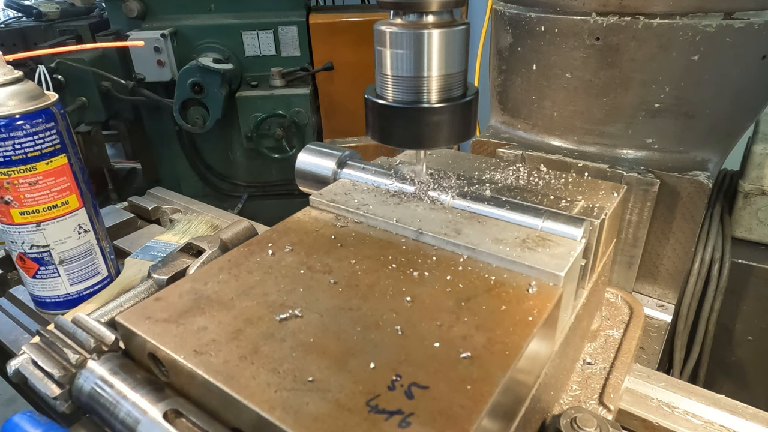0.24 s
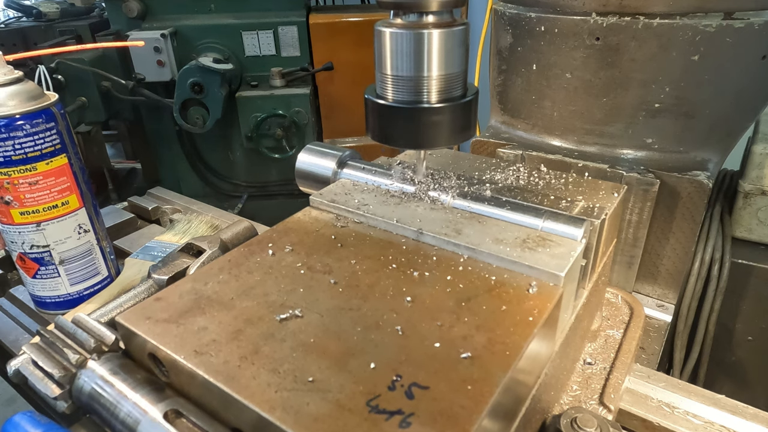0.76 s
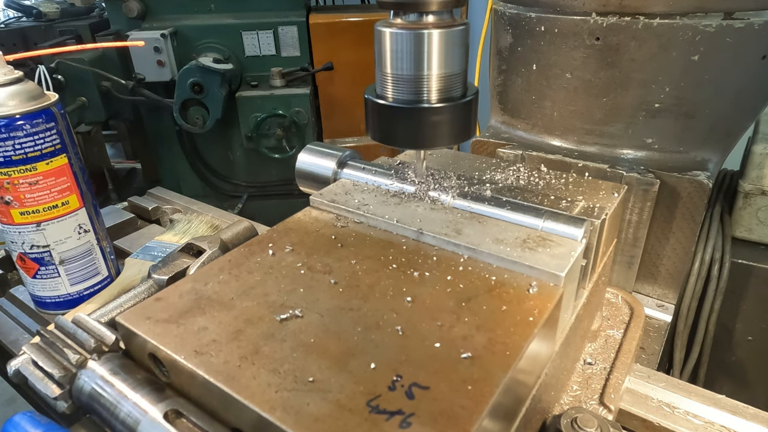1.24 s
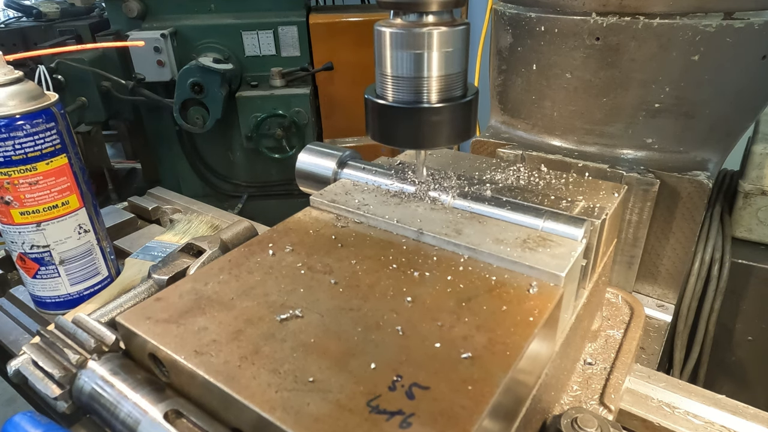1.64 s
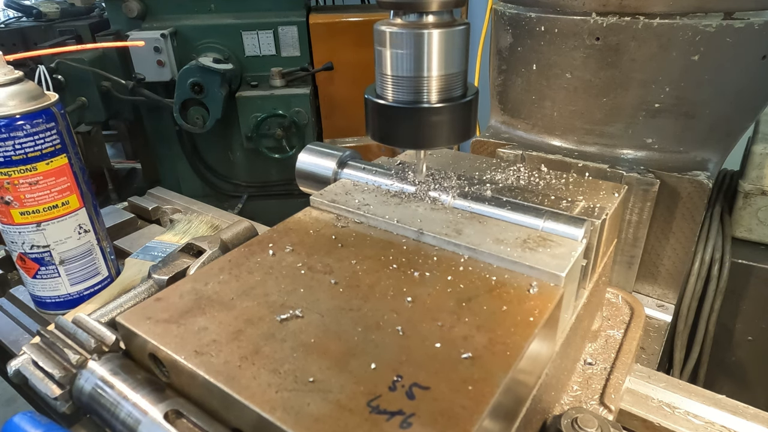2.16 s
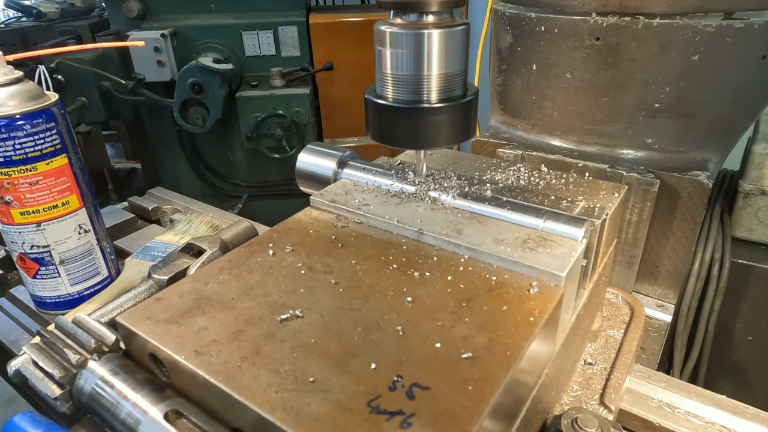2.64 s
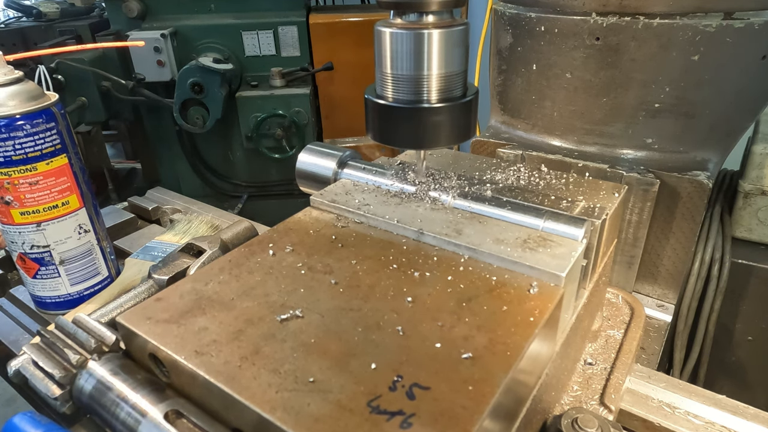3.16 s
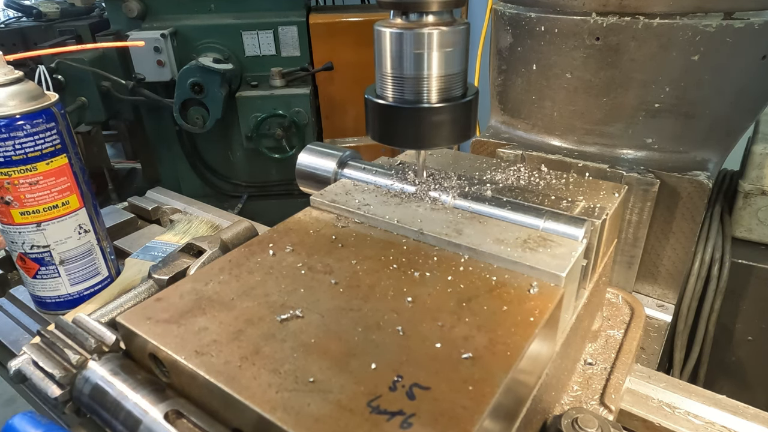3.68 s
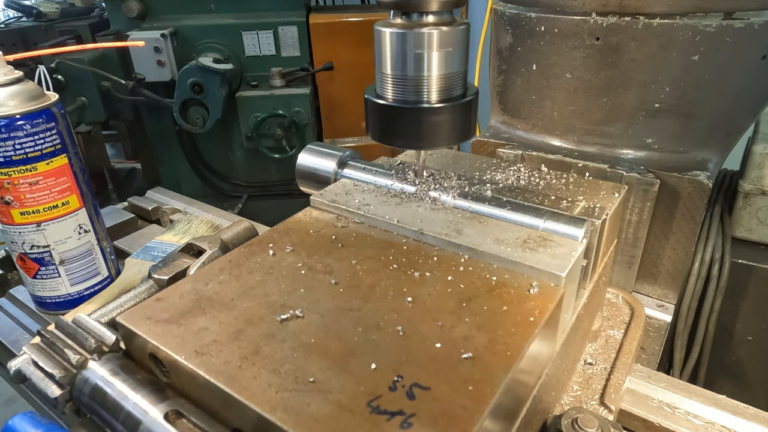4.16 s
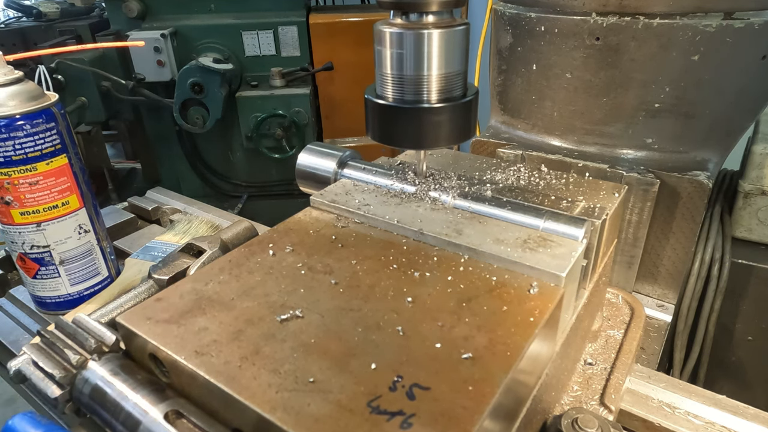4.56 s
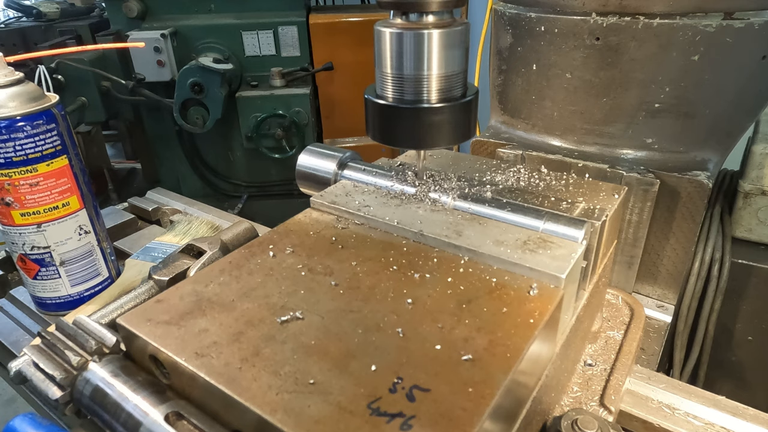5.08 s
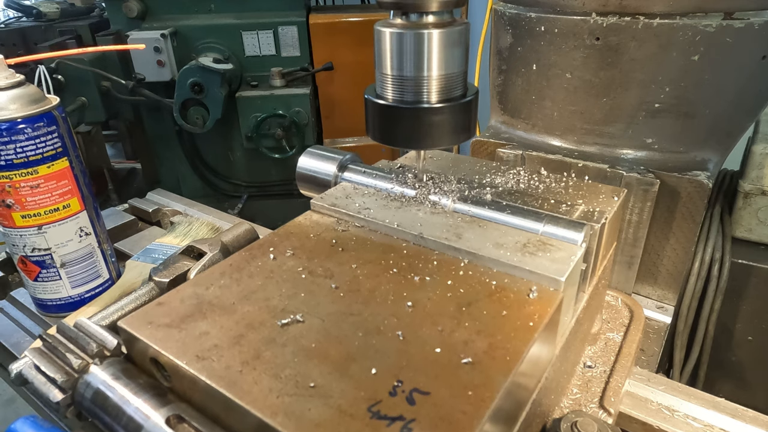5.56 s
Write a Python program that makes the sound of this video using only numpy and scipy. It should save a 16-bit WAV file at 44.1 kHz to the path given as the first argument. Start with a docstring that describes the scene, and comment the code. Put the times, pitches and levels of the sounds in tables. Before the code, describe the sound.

Continuous close mono sound of steel being milled, already under way. Fluttering gear whine and low motor rumble form the bed; over it comes a rapid chattering rasp, bright chip hiss and a wavering high whistle. Brief gliding squeaks scatter throughout, crowding in the middle and late parts. Near the end the cut lightens, the vice rings less, and the whistle drops in pitch. Short room echoes only.

```python
"""A vertical milling machine cuts a keyway in a steel shaft, close by in a workshop.
Throughout, a gear sings, throbbing once a turn, over gearbox rumble and the humming vice and table.
From the start two flutes rasp, hiss and snap off chips; the cutter whistles, higher while a flute presses.
Squeaks of flutes on the slot wall run through the cut.
Towards the end the cut lightens and the whistle sinks to the cutter's free pitch."""
import sys
import numpy as np
from scipy import signal
from scipy.fft import rfft, irfft
from scipy.io import wavfile
from scipy.ndimage import uniform_filter1d

SR = 44100
rng = np.random.default_rng(int(sys.argv[2]) if len(sys.argv) > 2 else 0)


def persist_wave(psi):
    """Save psi, clipped to +-1, as 16-bit WAV."""
    counts = np.round(np.clip(psi, -1, 1) * 32767).astype(np.int16)
    wavfile.write(sys.argv[1], SR, np.atleast_2d(counts).T)


N = 256662
TIME = np.arange(N) / SR  # s
BINS = np.fft.rfftfreq(N, 1 / SR)  # Hz

# gear mesh: time_s, tooth_rate_hz
MESH_RATE = [(0, 557.0), (.4, 555.9), (1.5, 556.1), (3.3, 556.4), (4.0, 556.8), (5.82, 556.9)]
# even part of the mesh tone: time_s, level_db
STEADY_MESH = [(0, -44), (1.3, -45), (1.9, -29), (3.3, -39), (3.8, -16.5), (4.5, -24.5), (5, -17),
               (5.5, -25), (5.82, -25.5)]
# runout of the gear and of shafts geared to it: turns_per_gear_turn, level_db, high_spot_gear_turns
SHAFT_RUNOUT = [(1.502, -29.5, .1), (3, -31.5, .22), (-3, -37, .23), (.5, -37, .88), (-.5, -37.5, 1.35),
                (2.5, -37.5, -.02), (2, -29, -.064), (-1, -39, -.2)]
# side tones of worn teeth: turns_per_gear_turn, level_db
TOOTH_WEAR = [(-1.5, -38.5), (3.5, -53.5), (4, -44), (4.5, -41), (6, -38.5)]
GEAR_TEETH = 33
SLACK_AT, PEAK_AFTER, SLACK_FORCE = 0.624, 0.72, .015  # turn shares; force as a factor
THROB_DB, LEAD_RAD = -12, 3.25
SPINDLE_BEAT_DB, SPINDLE_BEAT_S = -28.5, 0.041

# course of the cut: time_s, table_force_db, relative_chip_hiss_db, pitch_rise_at_full_contact_hz
CUT_COURSE = [(0, 6, -58.5, 2400), (1.2, 3.5, -59, 2443), (2.2, 2.5, -60.5, 2505), (3.4, 1.5, -62, 2500),
              (4.1, -1.5, -64, 2294), (4.3, 1, -70, 1566), (4.6, -2.5, -72.5, 1404), (4.9, -2, -70.5, 1477),
              (5.3, -9.5, -72, 1415), (5.5, 1, -71, 550), (5.82, -2, -72, 149)]
# deep and shallow flute: entry_turns, stay_turns, depth_0_to_1, relative_whistle_db
FLUTES = [(0.077, .49, 0.97, 0.5), (.55, .46, .72, -2)]
SPINDLE_HZ, FIRST_BITE_S = 15.636, .012
ARCH_POWER = 0.86  # under 1: pitch leaps on entry, drops late
ATTACK_SHARE, FADE_DB = .04, -13  # share of a flute's stay; fade at its end

# readiness of the cutter to whistle: time_s, level_db
WHISTLE_LEVEL = [(0, -42), (2.2, -39.5), (2.6, -39), (3.0, -39), (3.6, -37.5), (4.1, -37), (4.65, -42),
                 (4.9, -37), (5.3, -38.5), (5.5, -42.5), (5.82, -33.5)]
FREE_HZ = 4263  # cutter's bending pitch when no flute touches
TOP_HZ = 7170  # highest pitch that whistle and squeaks reach
SING_PULSES, SING_PEAK_S = 4, 5.653  # pulses per turn; time of one pulse

# squeaks at set times, loud and faint: middle_s, length_s, level_db, pitch_hz, glide_over_length_hz
SET_SQUEAKS = [(0.409, 0.021, -27.0, 5620, -1750), (0.437, 0.006, -24, 6220, -750),
               (0.47, 0.011, -23, 6330, 500), (0.596, 0.006, -25.0, 6760, 3000),
               (0.854, 0.0086, -19.5, 5380, 1750), (0.982, 0.006, -23, 6960, 2250),
               (1.046, 0.009, -24, 5600, -250), (1.177, 0.009, -22.5, 6380, -750),
               (1.335, 0.025, -33, 5620, 0), (1.371, 0.015, -18.5, 6420, -3500),
               (1.435, 0.025, -27.0, 6570, 0), (1.883, 0.013, -23, 6480, 750),
               (1.945, 0.0073, -24.5, 6370, -3500), (2.335, 0.023, -37, 5510, -250),
               (2.355, 0.006, -19, 5100, 3500), (2.392, 0.016, -20, 6870, 248.5),
               (2.457, 0.025, -22.5, 6430, 2000), (2.491, 0.013, -23, 6680, 500),
               (2.525, 0.027, -22.5, 6120, 1250), (2.583, 0.026, -20.5, 6050, 3500),
               (2.645, 0.021, -21.5, 5230, 1250), (2.65, 0.009, -15.5, 5530, 2500),
               (2.669, 0.006, -18, 5280, 1250), (2.712, 0.011, -21, 6460, -1250),
               (2.722, 0.0067, -23.0, 6800, 1000), (2.737, 0.0076, -25.0, 4970, 2250),
               (2.775, 0.0066, -20, 5990, -1000), (2.783, 0.025, -27.0, 5730, -1000),
               (2.794, 0.0053, -22.0, 5000, 750), (2.835, 0.009, -26, 5250, 2498),
               (2.861, 0.009, -25, 4700, -1000), (3.024, 0.0055, -26, 5540, -500),
               (3.104, 0.0044, -24.5, 6220, 3500), (3.161, 0.018, -27.5, 6450, -3500),
               (3.226, 0.017, -25, 6400, -3500), (3.287, 0.0081, -18.5, 5920, -1750),
               (3.42, 0.027, -21, 5960, -2000), (3.471, 0.006, -24, 5320, 3500),
               (3.48, 0.013, -24.5, 6430, -750), (3.546, 0.015, -17.5, 6520, -1000),
               (3.564, 0.0065, -24, 4540, 2500), (3.6, 0.0082, -21, 5000, 3250),
               (3.61, 0.009, -22, 6520, -250), (3.618, 0.026, -25, 6160, -1000),
               (3.672, 0.012, -30, 6760, 0), (3.692, 0.0067, -18.5, 4270, -3500),
               (3.744, 0.011, -24.5, 6050, 2996), (3.793, 0.011, -17.0, 5290, 3252),
               (3.838, 0.025, -38, 5710, 1250), (3.855, 0.0066, -22, 4720, 3500),
               (3.868, 0.022, -21, 6400, -250), (3.885, 0.009, -24.0, 4860, -2500),
               (3.997, 0.011, -29, 6570, 2500), (4.111, 0.006, -23.0, 4970, 3498),
               (4.175, 0.007, -26.5, 4700, 2500), (4.321, 0.016, -28, 5130, 2747.5),
               (4.383, 0.014, -25.5, 5380, -1500), (4.445, 0.0065, -23.0, 5750, 1739),
               (4.761, 0.03, -33, 5560, -250), (4.879, 0.007, -31, 4800, 3003),
               (4.885, 0.022, -27.5, 5600, -1000), (4.957, 0.03, -28, 5620, -250),
               (4.97, 0.011, -20.5, 4480, -750), (5.006, 0.007, -24.5, 4600, 3002),
               (5.012, 0.011, -24, 5600, 2), (5.034, 0.0098, -27.0, 4550, -1750),
               (5.044, 0.013, -29, 5100, -500), (5.073, 0.009, -21.0, 5400, -500),
               (5.098, 0.009, -18.5, 4500, -1000), (5.114, 0.0068, -30, 5040, 1753),
               (5.143, 0.014, -24, 5630, -500), (5.172, 0.02, -31.5, 4950, 1500),
               (5.206, 0.018, -24, 5530, -250), (5.237, 0.022, -30.0, 4890, 1250),
               (5.267, 0.025, -32, 5300, 1255.5), (5.33, 0.023, -33.5, 5700, -500),
               (5.396, 0.018, -21.5, 5120, 246), (5.417, 0.025, -27, 4430, -250),
               (5.458, 0.025, -30.0, 4720, 0), (5.488, 0.013, -29, 4650, 504),
               (5.521, 0.018, -20, 4740, 757), (5.545, 0.0087, -16.5, 4290, 5),
               (5.584, 0.023, -18.5, 4740, 0), (5.605, 0.02, -25, 4470, -1000),
               (5.651, 0.009, -16.5, 4470, 0), (5.668, 0.017, -25.0, 4230, -500),
               (5.683, 0.015, -31.5, 4330, -500), (5.718, 0.025, -24, 4390, 0),
               (5.747, 0.027, -26, 4270, 250), (5.777, 0.02, -16.5, 4390, 250),
               (5.795, 0.031, -36, 4370, -250), (5.808, 0.018, -31, 4360, 0)]
# scrape around a squeak: frequency_hz, spectrum_db_per_hz
SQUEAK_FIZZ = [(2000, -14), (7000, 2.5), (8000, 1), (10000, 2), (12500, 4.5), (14400, -10.5)]
LIGHT_SQUEAK_S, SQUEAK_ROUGH = 0.014, .42
SHAFT_HZ, SHAFT_Q = 5620, 35  # shaft mode ringing on after a squeak

# rasp of sheared steel: frequency_hz, spectrum_db_per_hz
RASP_SPECTRUM = [(100, -37.5), (500, 3.5), (950, -0.5), (1300, 1), (1800, -2), (2500, -3.5), (3300, -8),
                 (4000, -11), (5300, -15.5), (5900, -26), (7000, -34), (7800, -50), (14000, -46)]
# hiss of chips: frequency_hz, spectrum_db_per_hz
HISS_SPECTRUM = [(3000, 5), (5500, 17.5), (6700, 16), (7350, 15.5), (7600, 7), (8200, 5), (8600, 4),
                 (9500, 0.5), (10500, 6), (11500, 1.5), (13000, -8), (13700, -26), (14400, -22)]
# resonances of shaft and spindle head: frequency_hz, width_hz, level_db
HEAD_MODES = [(1130, 34, -44.5), (1178, 96, -49.5), (1348, 25, -45), (1370, 40, -50.5), (1438, 13, -45.5),
              (1630, 94, -45.5), (1774, 69, -50), (2010, 14, -49.5)]
# shaft modes ticked by chips crushed on the slot wall: frequency_hz, width_hz, relative_level_db
WALL_MODES = [(3107, 120, -47), (3600, 170, -46), (5540, 240, -45)]
# crunches at set times, mostly strong, one very faint: middle_s, relative_level_db
SET_CRUNCHES = [(.16, -22.5), (0.403, -20.5), (.422, -28), (.456, -27), (.545, -30), (.66, -26.5),
                (1.305, -30), (1.358, -21), (1.492, -20.5), (2.07, -24), (3.385, -25), (3.47, -20.5),
                (4.085, -23), (4.369, -26.5), (4.756, -23), (4.79, -23), (4.85, -44), (4.921, -25)]
RASP_DB, RASP_DB_PER_FORCE_DB = -32, .27

# large chips snapping off: time_s, relative_level_db
CHIP_SNAPS = [(0.268, -39), (.459, -37), (1.292, -40), (1.356, -43), (1.835, -36.5), (2.0178, -41),
              (2.6504, -42), (3.7908, -44), (4.9626, -43)]
# chip snap: frequency_hz, spectrum_db_per_hz
SNAP_SPECTRUM = [(800, -5), (3000, 22.5), (6500, 20.5), (7400, 4), (7900, 2.5), (11000, 5.5), (12500, -2),
                 (13500, -13), (14400, -6)]
# edge skidding before it bites: frequency_hz, spectrum_db_per_hz
SCRAPE_SPECTRUM = [(1000, -17.5), (2000, -7), (3300, 1), (4300, -0.5), (5400, -3.5), (6500, -16),
                   (7500, -36.5), (14000, -39)]

# resonances of vice and table driven by the cut: frequency_hz, width_hz, relative_level_db
TABLE_MODES = [(673, 41, -40.5), (757, 26, -37.5), (823, 120, -37)]
# sharp vice modes, strong under a heavy cut: frequency_hz, width_hz, relative_level_db
VICE_MODES = [(715, 18, -39.5), (750, 18, -41), (816.7, 6.2, -40.5)]
# hum from the flute beat: multiple_of_spindle_rate, relative_level_db
FLUTE_ORDERS = [(46, -46), (48, -46.5), (50, -47), (52, -41), (56, -52)]
# ringing of vice and table: time_s, relative_level_db
CLAMP_RINGING = [(0, -25), (.5, -26.5), (.65, -25.5), (1.35, -25), (1.6, -26.5), (2.3, -29), (2.75, -24),
                 (3.2, -29.5), (3.5, -26.5), (4.1, -34.5), (4.65, -34), (4.95, -29.5), (5.55, -38),
                 (5.82, -29)]
LIGHT_CUT_DB = -30  # that level in a light cut

# machine frame under the gear train: frequency_hz, spectrum_db_per_hz
FRAME_SPECTRUM = [(20, -84), (35, -66), (48, -45.5), (80, -26.5), (95, -15.5), (160, -13.5), (205, -10),
                  (300, -4), (440, -5), (490, -10), (600, 3), (680, -12.5), (1000, -24), (4000, -100)]
# ringing panels of the gear housing: frequency_hz, width_hz, relative_level_db
HOUSING_MODES = [(124.5, 2.5, -54.5), (170.8, 4, -57), (204.4, 4.9, -49), (217, 4.9, -50),
                 (265.8, 20, -40.5), (391, 4.2, -47), (617, 95, -40.5), (661, 10, -43)]
# steady tones of motor and spindle drive: frequency_hz, relative_level_db
DRIVE_TONES = [(176.8, -56), (200.0, -52), (219.0, -48), (250.2, -41), (265.8, -42.5), (281.4, -48),
               (387.8, -50.5), (422.2, -48)]
NOTCH_HZ, EDGE_HZ = 9030, 14450


def amp(db):
    """Decibels to gain."""
    return 10 ** (np.asarray(db) / 20)


def unit(x):
    """Scales to rms 1."""
    return x / np.sqrt(np.mean(abs(x) ** 2) + 1e-20)


def curves(rows):
    """Each column of a table of (s, values), sample by sample."""
    s, *columns = np.transpose(rows)
    return [np.interp(TIME, s, column) for column in columns]


def colour(x, points):
    """Filters by a spectrum of (Hz, dB) points, interpolated over log frequency."""
    hz, db = np.transpose(points)
    gain = amp(np.interp(np.log(BINS + 1), np.log(hz + 1), db))
    return irfft(rfft(x) * gain, N)


def noise():
    """White noise over the whole scene."""
    return rng.standard_normal(N)


def wander(rate_hz):
    """Random drift of rms 1, mostly below rate_hz."""
    return unit(irfft(rfft(noise()) / (1 + (BINS / rate_hz) ** 4), N))


def ring(modes, knocks=1):
    """Resonances kept ringing by random knocks, whose strength may vary in time."""
    power = sum(amp(db) ** 2 / width / (1 + ((BINS - hz) / width) ** 2 * 2) ** 2 for hz, width, db in modes)
    total = np.sqrt(sum(amp(db) ** 2 for hz, width, db in modes))
    return total * unit(irfft(rfft(knocks * noise()) * np.sqrt(power), N))


def tones(rows, waver_db=2.0):
    """Steady sines of (Hz, rms dB), each wavering a little."""
    total = 0
    for hz, db in rows:
        level = np.sqrt(2) * amp(db + waver_db * wander(5.5))
        total = total + level * np.sin(2 * np.pi * (hz * TIME + rng.random()))
    return total


def add(mix, s, sound):
    """Mixes a sound in at a time."""
    part = mix[max(round(s * SR), 0):][:len(sound)]
    part += sound[:len(part)]


def gear(overtone_db=-34, flutter_db=-46, sharing_s=0.0037, ceiling_db=-13.0):
    """Mesh tone: each turn the teeth load up and run ahead, then fall slack; other shafts beat against it."""
    teeth = np.cumsum(curves(MESH_RATE)[0]) / SR
    turns = teeth / GEAR_TEETH - SLACK_AT
    share = turns % 1
    force = np.interp(share, [0, PEAK_AFTER, 1], [SLACK_FORCE, 1, SLACK_FORCE])
    load = force * np.exp(1j * LEAD_RAD * (share - .5))
    throb = uniform_filter1d(load, int(sharing_s * SR))  # several teeth share the load
    shafts = sum(amp(db) * np.exp(2j * np.pi * ratio * (turns - spot)) for ratio, db, spot in SHAFT_RUNOUT)
    wear = sum(amp(db) * np.exp(2j * np.pi * (ratio * turns + rng.random())) for ratio, db in TOOTH_WEAR)
    spindle = amp(SPINDLE_BEAT_DB) * np.exp(2j * np.pi * SPINDLE_HZ * (TIME - SPINDLE_BEAT_S))
    flutter = amp(flutter_db) * (wander(26) + 1j * wander(15.0))
    steady = amp(curves(STEADY_MESH)[0])
    envelope = steady + amp(THROB_DB) * throb + shafts + wear + spindle + flutter
    tone = envelope * np.exp(2j * np.pi * teeth)
    # loud swells of the gear tone are flat-topped
    tone = tone / np.sqrt(np.hypot(1, (abs(tone) / amp(ceiling_db)) ** 2))
    return (tone + amp(overtone_db) * tone * unit(tone)).real


def cutter_turn():
    """Each flute presses in an arch and voices most just after entry, repeating with the spindle."""
    contact, voice = np.zeros(N), np.zeros(N)
    for enters, stays, depth, db in FLUTES:
        u = np.minimum(((TIME - FIRST_BITE_S) * SPINDLE_HZ - enters) % 1 / stays, 1)
        contact += depth * abs(np.sin(np.pi * u)) ** ARCH_POWER
        voice += np.minimum(u / ATTACK_SHARE, 1) * amp(db + FADE_DB * u ** 3) * (u < 1)
    return contact, voice


def fractures(per_s, spread_db):
    """Tiny breaks in the steel: a train of clicks, a few of them large."""
    size = amp(spread_db * np.minimum(rng.exponential(1, N), 4.5)) * rng.choice([-1, 1], N)
    return unit(size * (rng.random(N) < per_s / SR))


def crunches(length_s=0.036, level_db=-4.5, small_db=-34.5, spread_db=2, db_per_force_db=0.14, count=40):
    """Short swells of tearing: some at set times, and small random ones that weaken as the force falls."""
    swell, small, bump = np.zeros(N), np.zeros(N), np.hanning(int(length_s * SR))
    for s, db in SET_CRUNCHES:
        add(swell, s - length_s / 2, amp(db + level_db) * bump)
    for when, size in rng.random((count, 2)):
        add(small, when * N / SR, amp(small_db + spread_db * (2 * size + 0.5)) * bump)
    return swell + small * amp(db_per_force_db * curves(CUT_COURSE)[0])


def cutting(hiss_db=14.0, grit=0.59, tear_grit=1.4, hiss_grit=0.74, uneven_db=1.28, bite_db=0.4,
            wall_chop=0.51):
    """Shearing steel rasps, tears, hisses and sets spindle head and shaft ringing."""
    force_db, spray_db, rise_hz = curves(CUT_COURSE)
    spray_level = amp(spray_db)
    contact, voice = cutter_turn()
    bite = amp(bite_db * voice + uneven_db * wander(72))
    coarse = fractures(per_s=1500, spread_db=4)
    fine = fractures(per_s=700, spread_db=5)
    torn = fractures(per_s=1200, spread_db=1.0)
    shear = unit(colour(noise() + grit * coarse, RASP_SPECTRUM))
    tear = unit(colour(noise() + tear_grit * torn, RASP_SPECTRUM))
    rasp = bite * amp(RASP_DB + RASP_DB_PER_FORCE_DB * force_db) * shear + crunches() * tear
    hiss = amp(hiss_db) * spray_level * unit(colour(noise() + hiss_grit * fine, HISS_SPECTRUM))
    ticks = fractures(per_s=900, spread_db=3.5) * (1 - wall_chop + wall_chop * unit(contact))
    rub = unit(spray_level * np.sqrt(rise_hz)) * ring(WALL_MODES, ticks)
    return rasp + bite * ring(HEAD_MODES) + hiss + rub


def whistle(unsteady=0.14, wobble_hz=35, width_hz=220, swell_db=2.5, pulse_depth=.55):
    """A flute in the cut stiffens the cutter and raises its ringing; in a light cut it sings on in pulses."""
    level_db, rise_hz = curves(WHISTLE_LEVEL)[0], curves(CUT_COURSE)[2]
    contact, voice = cutter_turn()
    pressed_hz = FREE_HZ + rise_hz * (contact + unsteady * wander(113.3))
    hz = np.minimum(pressed_hz + wobble_hz * wander(250), TOP_HZ)
    rough = np.tanh(rise_hz / 1100)  # a heavy cut scrapes, a light one sings
    grip = 1 - rough + rough * (wander(width_hz) + 1j * wander(width_hz))
    grip = grip / np.hypot(1 - rough, np.sqrt(2) * rough)
    ringing = grip * np.exp(2j * np.pi * np.cumsum(hz) / SR)
    singing = 1 + pulse_depth * np.cos(2 * np.pi * SING_PULSES * SPINDLE_HZ * (TIME - SING_PEAK_S))
    strength = rough * voice + (1 - rough) * singing
    return strength * amp(level_db + swell_db * wander(45)) * unit(ringing.real)


def light_squeaks(above_db=-3.0, spread_db=0.5, into_stay=0.5, late_s=0.0076, press=0.9, press_spread=0.18,
                  glide_spread_hz=1000, entry_db=2.5, entry_s=.007, entry_glide_hz=1800,
                  exit_db=-6.5, exit_into_stay=0.87, exit_press=0.63, exit_glide_hz=-1700):
    """Every flute chirps on entry, squeaks a little by chance and slides down on leaving: SET_SQUEAKS rows."""
    level_db, rise_hz = curves(WHISTLE_LEVEL)[0], curves(CUT_COURSE)[2]
    rows = []
    for turn in range(int(N / SR * SPINDLE_HZ)):
        for enters, stays, depth, db in FLUTES:
            late, loud, high, slide, flick, release = np.clip(rng.standard_normal(6), -2, 2)
            s = FIRST_BITE_S + (turn + enters) / SPINDLE_HZ
            stay_s = stays / SPINDLE_HZ
            at = int(np.clip(s * SR, 0, N - 1))
            load = rise_hz[at] / rise_hz.max()
            flute_db = level_db[at] + db
            flute_rise_hz = rise_hz[at] * depth
            rows.append((s, entry_s, flute_db + entry_db + spread_db * flick,
                         FREE_HZ, entry_glide_hz * np.sqrt(load)))
            rows.append((s + into_stay * stay_s + late_s * late, LIGHT_SQUEAK_S,
                         flute_db + above_db + spread_db * loud,
                         FREE_HZ + flute_rise_hz * (press + press_spread * high), glide_spread_hz * slide * load))
            rows.append((s + exit_into_stay * stay_s, LIGHT_SQUEAK_S,
                         flute_db + exit_db + spread_db * release,
                         FREE_HZ + flute_rise_hz * exit_press, exit_glide_hz * load))
    return rows


def squeaks(jitter=0.068, wobble_hz=65, scrape_db=-13, octave_db=-35, fizz_db=-32, shaft_db=-7):
    """Stick and slip of a flute on the slot wall: a gliding whistle, rougher the further it is off free pitch."""
    out, drift, grip = np.zeros(N), wander(720), wander(360)
    fizz = unit(colour(noise(), SQUEAK_FIZZ))
    scrape = unit(colour(fractures(per_s=2200, spread_db=1), SCRAPE_SPECTRUM))
    for s, length_s, db, hz, glide_hz in list(SET_SQUEAKS) + light_squeaks():
        first = max(int((s - length_s / 2) * SR), 0)
        at = np.arange(first, min(int((s + length_s / 2) * SR), N))
        u = (at / SR - s) / length_s  # -0.5 to 0.5
        off_hz = abs(hz - FREE_HZ)
        press = np.tanh(off_hz / 1200)
        pitch_hz = np.minimum(hz + glide_hz * u + (wobble_hz + jitter * off_hz) * drift[at], TOP_HZ)
        phase = 2 * np.pi * np.cumsum(pitch_hz) / SR
        swell = amp(db) * np.cos(np.pi * u) ** 2 * (1 + SQUEAK_ROUGH * press * grip[at])
        edge = amp(octave_db) * np.sin(2 * phase) + amp(fizz_db) * fizz[at] + amp(scrape_db) * scrape[at]
        out[at] += swell * (np.sin(phase) + press ** 2 * edge)
    return out + amp(shaft_db) * signal.lfilter(*signal.iirpeak(SHAFT_HZ, SHAFT_Q, SR), out)


def scrapes(rise_s=.0015, decay_s=0.0053, level_db=6.0, spread_db=5.5, lead_s=0.0013):
    """Each flute skids on the steel for an instant as it enters, the deep one harder on average."""
    burst, t = np.zeros(N), np.arange(-SR // 100, SR // 30) / SR
    shape = np.exp(np.minimum(t / rise_s, -t / decay_s))
    for turn in range(int(N / SR * SPINDLE_HZ)):
        for enters, stays, depth, db in FLUTES:
            s = FIRST_BITE_S + (turn + enters) / SPINDLE_HZ - lead_s
            add(burst, s + t[0], amp(db + spread_db * rng.uniform(-1.1, 1)) * shape)
    heavy = np.tanh(curves(CUT_COURSE)[2] / 1100)
    level = amp(level_db + curves(WHISTLE_LEVEL)[0])
    return level * heavy * burst * unit(colour(noise(), SCRAPE_SPECTRUM))


def chips(rise_s=0.0024, decay_s=0.0056, level_db=9):
    """Each chip tears loose and breaks away with a dry tick: a noise burst."""
    burst, t = np.zeros(N), np.arange(-SR // 50, SR // 20) / SR
    shape = np.exp(np.minimum(t / rise_s, -t / decay_s))
    for s, db in CHIP_SNAPS:
        add(burst, s + t[0], amp(db + level_db) * shape)
    return burst * unit(colour(noise(), SNAP_SPECTRUM))


def clamping(table_share=0.63, vice_share=1.3):
    """The cut rings the table and, more steeply, the vice, which also hums with the flute beat."""
    over_db = curves(CLAMP_RINGING)[0] - LIGHT_CUT_DB
    hum = tones([(order * SPINDLE_HZ, db) for order, db in FLUTE_ORDERS])
    table = amp(table_share * over_db) * ring(TABLE_MODES)
    vice = amp(vice_share * over_db) * (ring(VICE_MODES) + hum)
    return table + vice


def gearbox(rumble_db=-30.5, db_per_force_db=0.12):
    """Bearings and idle gears shake the frame and its panels, a little more under a heavy cut."""
    rumble = amp(rumble_db) * unit(colour(noise(), FRAME_SPECTRUM))
    load = amp(db_per_force_db * curves(CUT_COURSE)[0])
    return load * (rumble + ring(HOUSING_MODES) + tones(DRIVE_TONES))


def workshop(x, t60_s=0.13, wet_db=-9):
    """Scattered echoes from the machine column and the walls."""
    t = np.arange(SR // 2) / SR
    taps = rng.choice([-1, 1], len(t)) * (rng.random(len(t)) < 2500 / SR) * (t > .003)
    echoes = taps * amp(-60 * t / t60_s)
    return x + amp(wet_db) * signal.fftconvolve(x, echoes / np.linalg.norm(echoes))[:N]


def scene():
    """The drive and the cut together; whistle, scrapes, squeaks and chips echo."""
    echoing = workshop(whistle() + scrapes() + squeaks() + chips())
    return (gear() + cutting() + echoing + clamping() + gearbox())[None]


def record(dry):
    """The microphone has a narrow dip in the treble; then the band limit."""
    dip = 1 - np.exp(-((BINS - NOTCH_HZ) / 220) ** 2)
    heard = irfft(rfft(dry) * dip, N)
    lowpass = signal.firwin(511, EDGE_HZ, window=("kaiser", 9), fs=SR)
    return signal.oaconvolve(heard, lowpass[None], "same")


dry = scene()
out = record(dry)
persist_wave(out)
```